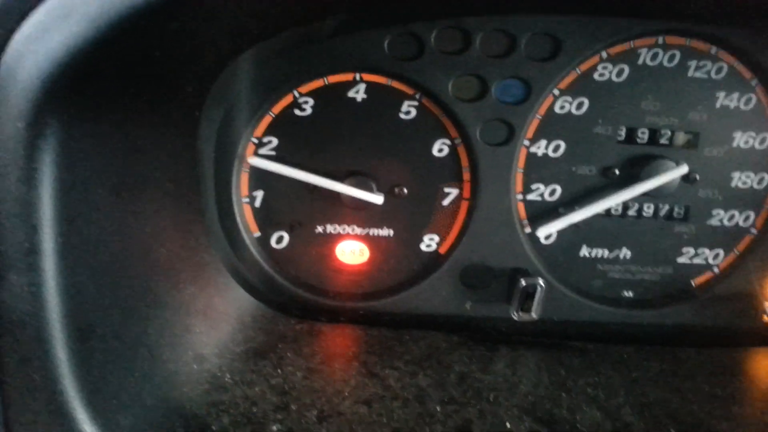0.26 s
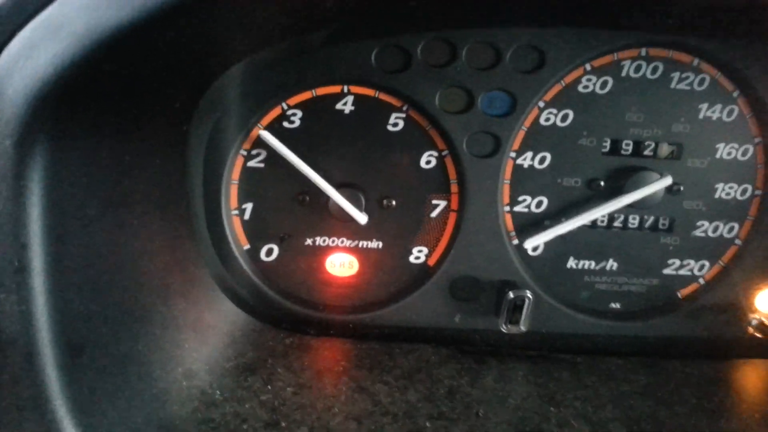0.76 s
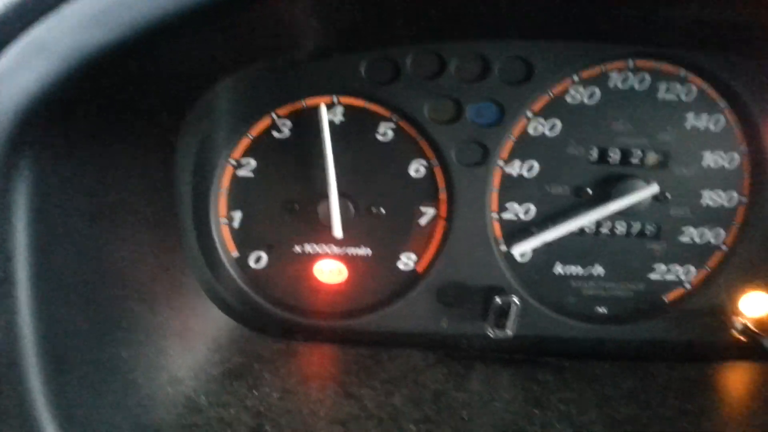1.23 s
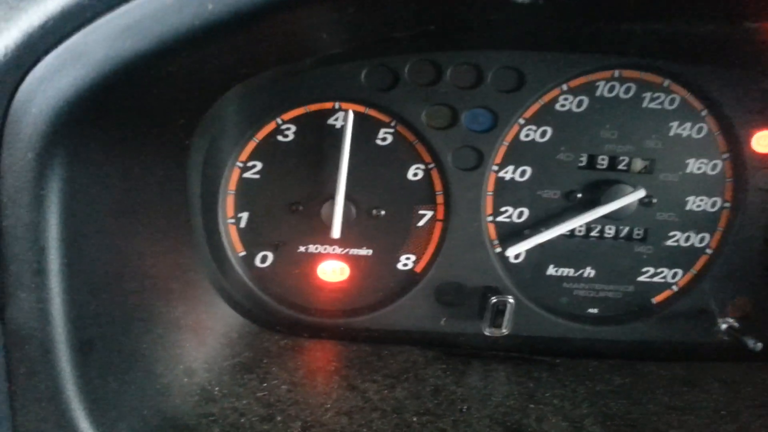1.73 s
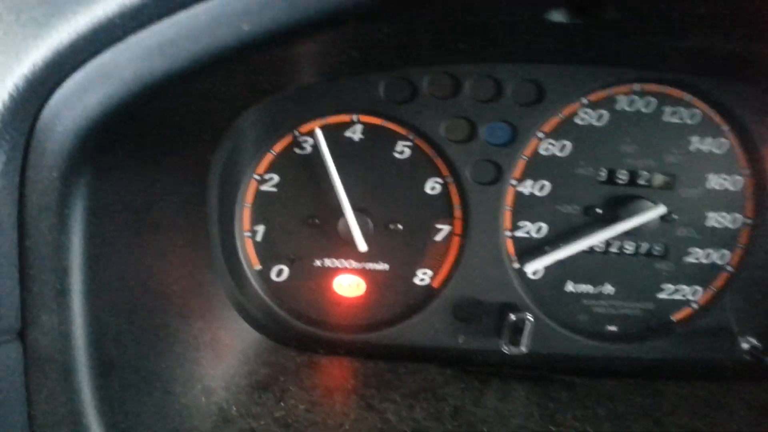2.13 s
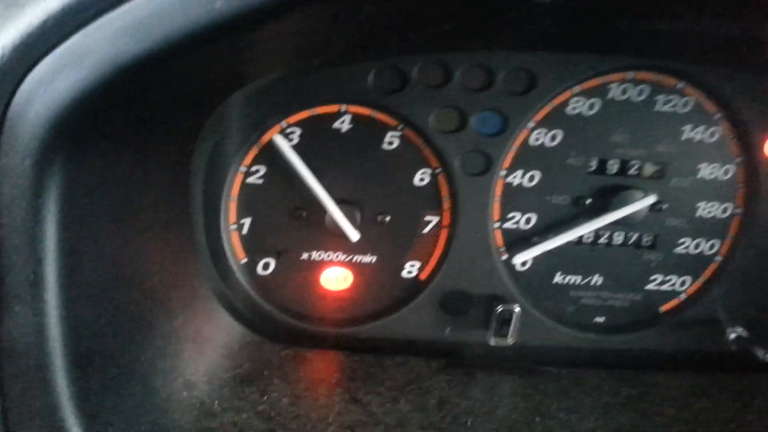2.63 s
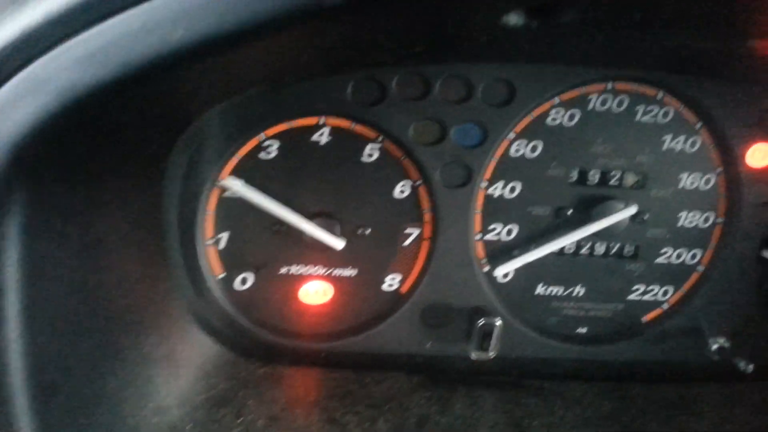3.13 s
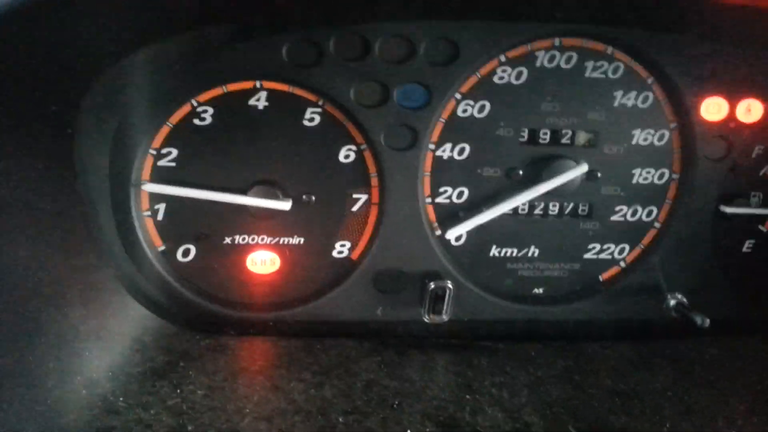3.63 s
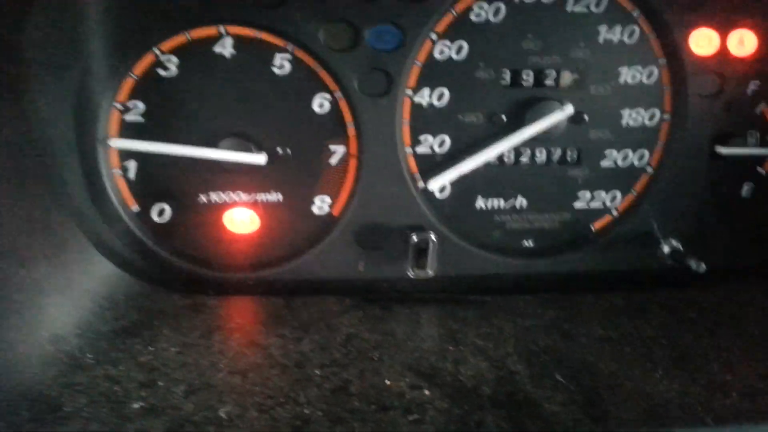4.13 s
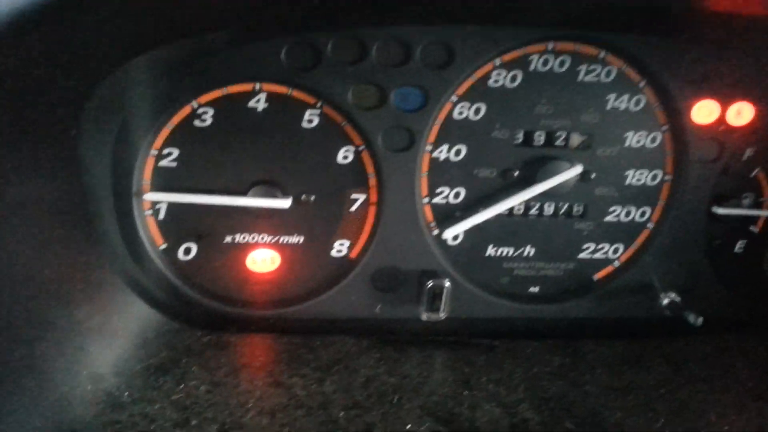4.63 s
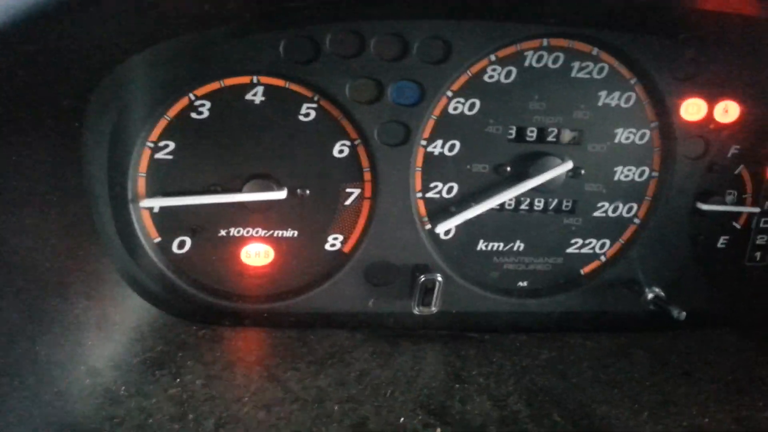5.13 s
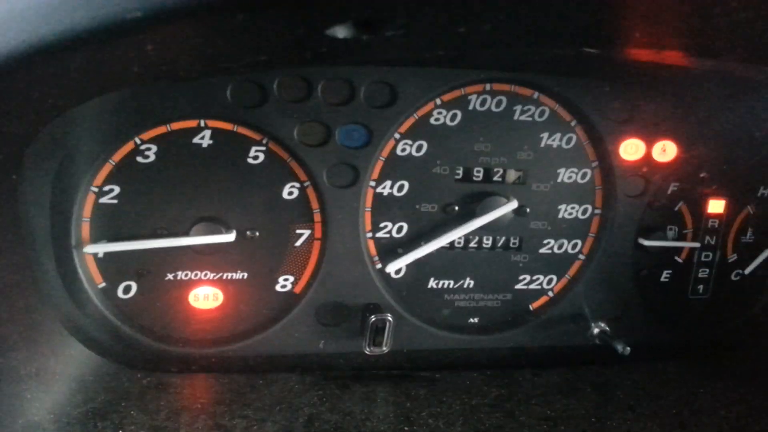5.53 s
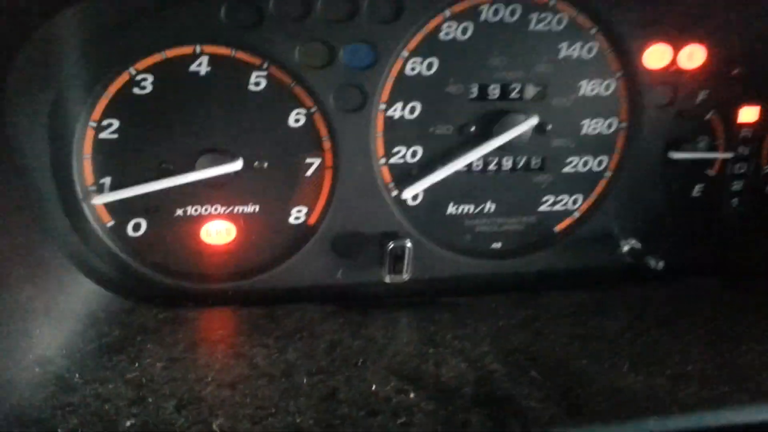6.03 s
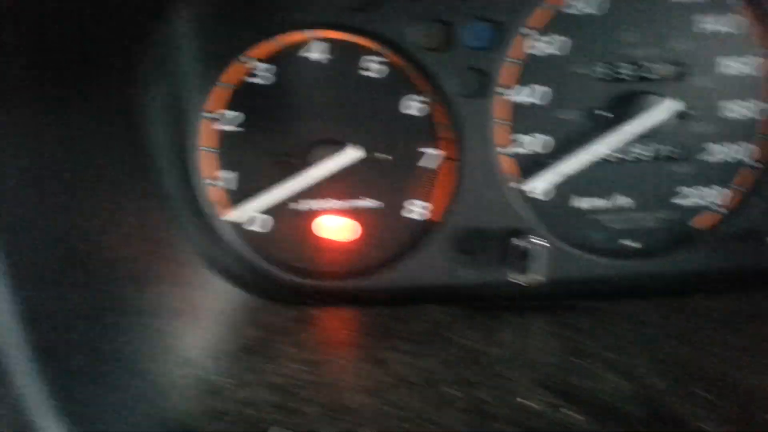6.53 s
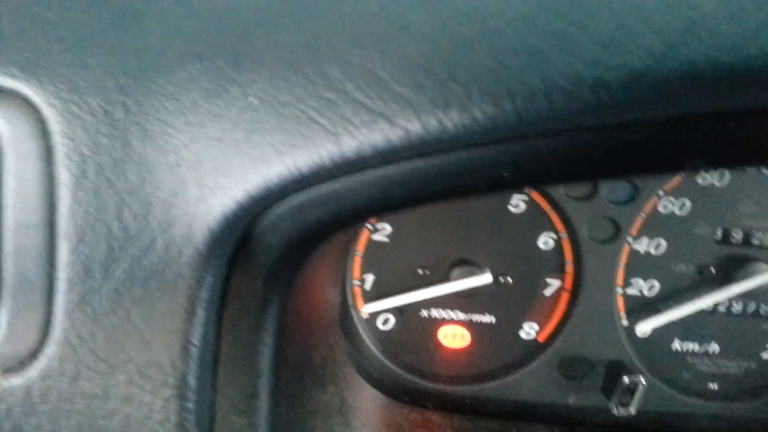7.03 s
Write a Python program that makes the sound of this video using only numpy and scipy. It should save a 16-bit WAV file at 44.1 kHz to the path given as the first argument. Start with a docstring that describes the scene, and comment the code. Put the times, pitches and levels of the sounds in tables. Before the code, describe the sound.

A rough four-cylinder car engine revs up, stumbles and pops back down, thuds slower and slower until nearly stalling, then weakly catches again.

```python
"""The driver's seat of a car with a misfiring four-cylinder engine: it revs to about 4600 rpm, stumbles, falls back,
pops on single cylinders ever more slowly, almost stalls with faint thuds, then catches again into a lumpy idle.
Every exhaust pulse thumps and barks in resonant modes; strong ones steepen into a crack with noisy rasp.
Fast firings merge into a drone of sine orders; the shut throttle leaves the pipe ringing hollowly.
Shaped noise makes the rattle, bay rush, growing hiss, squeaks, scuffs, whirr and a knock."""
import sys
import numpy as np
from scipy import signal
from scipy.fft import rfft, irfft, next_fast_len
from scipy.io import wavfile
from scipy.ndimage import uniform_filter1d, minimum_filter1d

SR = 44100
rng = np.random.default_rng(int(sys.argv[2]) if len(sys.argv) > 2 else 0)


def int16_out(signal):
    """Quantize to a 16-bit WAV file."""
    q = np.round(np.clip(np.atleast_2d(signal).T, -1, 1) * 32767)
    wavfile.write(sys.argv[1], SR, q.astype(np.int16))


N = 320607
T = np.arange(N) / SR
SIZE = 16384  # samples of the transform that shapes each pulse
GRID = np.fft.rfftfreq(SIZE, 1 / SR)

# All dB values are relative levels inside the mix.
# the rev and its drone: time_s, firing_rate_hz, first_order_db, second_order_db, third_order_db
REV = [(0.0, 63, -23, -13, -19.5), (0.02, 62.3, -11, -14, -41.5), (0.102, 64.5, -22, -17.5, -6),
       (0.16, 62.2, -12, -21.5, -39), (0.212, 60.5, -20.5, -13, -24.5), (0.32, 62.7, -14.5, -22.5, -9.5),
       (0.39, 70.2, -11.5, -29, -23.5), (0.47, 64.3, -15, -15.5, -21.5), (0.62, 83.4, -14, -46, -6),
       (0.67, 91.6, -7.5, -27, -9), (0.74, 83, -11, -33, -3), (0.88, 102.5, -3, -26.5, -9),
       (0.96, 110.5, -8, -28.5, -15.5), (1.02, 114.7, -4.5, -7, -17.5), (1.11, 131, -10, -9, -14.5),
       (1.202, 125.6, -9, -13.5, -19.5), (1.299, 131.3, -14, -17, -36), (1.58, 154.6, -10.5, -13, -38),
       (1.72, 128, -7, -21.5, -25.5), (1.95, 111, -8, -15.5, -18), (2.12, 98.6, -6.5, -17.5, -22),
       (2.21, 92.3, -8.5, -34, -18.5), (2.392, 94.3, -11, -38.5, -22.5), (2.42, 95, -4, -16.5, -64),
       (2.45, 84, -11.5, -36, -10), (2.51, 86, -8, -28, -8), (2.73, 82.5, -9.5, -34, -12),
       (2.812, 78, -9, -26.5, -13), (2.89, 74.4, -9, -22, -26), (3.041, 70.4, -11.5, -20, -19),
       (3.16, 59.6, -18, -17.5, -33)]
# the long sinking after it: time_s, firing_rate_hz
STALL = [(3.3, 54), (3.5, 49.5), (4.3, 51), (4.7, 39), (5.5, 37), (6.05, 27), (6.4, 16), (6.9, 21),
         (7.2, 27)]
# how hard the ordinary firings burn: time_s, force_db
LOAD = [(0, -25.5), (.09, -21.5), (.3, -23), (.5, -22.5), (.64, -20.5), (.8, -14.5), (.92, -19.5),
        (1.05, -15.5), (1.2, -24.5), (1.31, -19.5), (1.62, -21), (1.72, -28), (2.1, -27), (2.16, -24.5),
        (2.25, -32), (2.38, -29), (2.47, -23.5), (2.55, -31.5), (2.8, -33.5), (2.88, -27), (3.16, -49.5),
        (4.4, -60), (4.8, -59), (5.35, -54), (6, -78.5), (6.9, -72), (7.27, -46.5)]
# single pulses, from hard pops to the faint compression thuds of the near stall:
# time_s, force_db, extra_body_db, extra_thump_db
POPS = [(0.226, -15, 0.5, 0), (0.275, -12, 2.5, 2), (0.466, -15.5, 1, 0), (0.751, -13.5, 0, 4),
        (0.962, -13.5, 0, -0.5), (1.825, -25.5, 2, -0.5), (2.18, -12.5, -1, -1), (2.212, -24.5, -3.5, -0.5),
        (2.236, -23.5, 5, -1), (2.29, -22, 5, -3.5), (2.324, -28, 3, 1.5), (2.383, -22, 0, -2),
        (2.439, -24.5, -0.5, 2.5), (2.479, -26, -0.5, 4), (2.522, -15, -3.5, 1), (2.565, -8.5, 3, 2.5),
        (2.609, -14, -1, -1), (2.658, -12.5, 2, 0), (2.705, -21, 1, 4.5), (2.748, -14, -4.5, 3),
        (2.8, -14, 3, 0), (3.194, -33, 6.5, 3), (3.211, -25.5, 1, 1), (3.265, -26, 5.5, -4.5),
        (3.285, -27.5, -0.5, -3.5), (3.41, -25.5, 5.5, -0.5), (3.492, -13, -1.5, -3),
        (3.574, -16.5, 0, -3.5), (3.654, -17, -1, -3), (3.738, -22, 0, -4), (3.822, -18, 0.5, 3.5),
        (3.87, -22.5, -2.5, -1.5), (3.892, -17.5, -0.5, -7), (3.914, -20, 0.5, -5.5),
        (3.932, -22.5, -3, -2.5), (3.95, -19.5, -1.5, -2), (4.058, -16, 0, -1.5), (4.138, -15.5, 0.5, -4.5),
        (4.214, -12, 0, -1), (4.292, -13.5, -0.5, 0), (4.371, -17, 2, -2), (4.45, -38, 5.5, -1.5),
        (4.538, -20, 2, -1), (4.638, -44.5, 3.5, -0.5), (4.733, -20.5, -2.5, 2.5), (4.843, -20, -0.5, 0.5),
        (4.949, -22, 2, 0.5), (5.054, -13.5, 2, 3.5), (5.134, -38, 2.5, 0.5), (5.16, -17.5, 0.5, 0),
        (5.211, -20.5, 0, -0.5), (5.26, -21.5, 3.5, -1.5), (5.364, -19, -0.5, -1.5), (5.466, -19.5, 2, 0),
        (5.579, -18.5, 0.5, -2), (5.701, -22, 0.5, -1), (5.828, -24.5, -1, 1.5), (5.96, -30, 0, 1.5),
        (6.107, -39, -2, 1.5), (6.301, -68, -4, 1.5), (6.364, -58.5, -7, -3), (6.431, -62.5, -7, 1),
        (6.553, -37, 4, 0.5), (6.652, -58, 0, 0), (6.718, -53, -3, 0), (6.77, -35, -0.5, 1),
        (6.869, -41, -1, 0), (6.951, -40, 3, 0.5), (6.992, -25.5, -1.5, 1.5), (7.028, -50, -11, -0.5),
        (7.055, -46, 3, 1), (7.107, -42, -5, 1), (7.145, -41.5, -8, 1.5), (7.184, -41.5, -15, 2),
        (7.222, -26, -2.5, 0), (7.257, -43, 6.5, -0.5)]
# the spark drops out: start_s, end_s
MISFIRES = [(.109, .222), (.238, .27), (.376, .4), (.424, .46), (.664, .708), (.724, .74), (.93, .952)]
# cylinders in firing order: relative_strength (no unit)
CYLINDERS = [0.11, -0.41, 1, 0.78]
MAX_EXCESS = 1  # a cylinder burns at most this many spreads above the mean
# spells of uneven burning: start_s, end_s, extra_spread_db between cylinders
ROUGH_SPELLS = [(0.252, 0.5, 2.5), (1.25, 1.67, 4), (2.162, 2.829, 3)]
EVEN_SPREAD_DB, SPELL_FADE_S = 1.1, 0.08
# coasting with the throttle shut: start_s, end_s
COASTS = [(1.64, 2.14), (2.86, 3.12)]
COAST_ATTACK_S, COAST_RELEASE_S = .06, .06

# low cabin and exhaust resonances, the thump: centre_hz, width_hz, level_db
LOW_MODES = [(55, 8, -6), (88.6, 17.1, 1.5), (158.1, 37.6, -2.5), (161.8, 27, -2.5)]
# middle cabin and exhaust resonances, the bark: centre_hz, width_hz, level_db
MID_MODES = [(207.5, 8.7, 2.5), (249.8, 17.8, 5.5), (281, 11, -8.5), (350, 27, -15), (359.4, 88, 2),
             (451.5, 180, -12)]
# the silencer's ring: centre_hz, width_hz, level_db
SILENCER_MODES = [(234, 12, 5), (274, 54, 0), (342.6, 37, 7), (413, 49, -1.5)]
# the short dull body of a single pulse: centre_hz, width_hz, level_db
BODY_MODES = [(137, 61, 4), (345, 123, 5), (431.5, 74, -5), (505, 40, -13)]
# hollow ring of the pipe with the throttle shut: centre_hz, width_hz, level_db
PIPE = [(610, 70, -8), (815, 60, -2), (935, 75, 0), (1160, 90, -13), (1730, 130, -11), (2450, 280, -23)]
# the silencer sings when the fourth order meets its ring: centre_hz, half_width_hz, level_over_bark_db
SING = (246, 18, 2)

# steep front of an ordinary firing: frequency_hz, level_db
RUN_FRONT = [(120, -37), (300, -3.5), (450, 6), (650, 11.5), (900, 1), (1500, -8), (2500, -15.5),
             (3500, -28.5), (5000, -40), (8000, -55), (15000, -56.5)]
# its paths to the seat: delay_s, gain (no unit)
RUN_PATHS = [(0, 0.37), (.0013, -0.11), (.0031, -0.19)]
# steep front of a single pulse: frequency_hz, level_db
FRONT = [(100, -68.5), (300, -21.5), (480, 14.5), (650, 6.5), (850, 1), (1100, -10.5), (1600, -11),
         (2500, -18), (3500, -29.5), (5000, -33.5), (7000, -45.5), (12000, -51), (16000, -54)]
# its paths to the seat: delay_s, gain (no unit)
PATHS = [(0.001, -.8), (.0032, -1.3), (.0055, 0.98), (.0078, 1), (.0098, -1.5), (.012, 0.7), (0.0155, 0.78),
         (.02, 0.074)]

# colour of the tearing gas: frequency_hz, density_db per Hz
RASP = [(200, -32.5), (700, 9.5), (1300, 2), (1750, -1), (2500, -10.5), (3500, -15.5), (5000, -24.5),
        (7000, -30.5), (10000, -31.5), (15000, -49.5)]
# colour of the gas puffs with the throttle shut: frequency_hz, density_db per Hz
OVERRUN = [(200, -24), (600, -5), (780, -5.5), (920, 1.5), (1060, 0), (1350, -17.5), (1750, -3.5),
           (2050, -28), (2500, -17.5), (4000, -41), (8000, -67)]
# colour of the engine bay: frequency_hz, density_db per Hz
BAY = [(30, -13.5), (90, 22.5), (190, 17.5), (250, 25.5), (300, 13.5), (380, 11), (480, 1), (600, 3.5),
       (800, -3.5), (1000, -3), (1350, -13.5), (2000, -13), (2400, -15), (2750, -17), (4500, -25.5),
       (6000, -36.5), (15000, -55.5)]
# colour of loose parts that rattle when the labouring engine shakes: frequency_hz, density_db per Hz
RATTLE = [(200, -5.5), (380, 22.5), (550, 7), (1000, 4.5), (2000, 2), (3000, -3), (4500, -9.5),
          (7000, -27.5), (14000, -37)]
# dull scuffs as the engine catches: middle_s, length_s, level_db
SCUFFS = [(6.661, 0.065, -32.5), (6.985, 0.052, -19), (7.061, 0.039, -19), (7.098, 0.045, -36),
          (7.218, 0.021, -31)]
# their colour: frequency_hz, density_db per Hz
SCUFF = [(150, -14), (300, 14.5), (450, 5.5), (650, -5.5), (1000, -22.5), (2000, -43.5), (6000, -54.5)]
# thin, faint squeaks: middle_s, length_s, level_db
SQUEAKS = [(6.539, 0.016, -49.5), (6.572, 0.1, -62), (6.854, 0.026, -56), (6.939, 0.034, -56),
           (6.984, 0.037, -67)]
# a faint whirr of the engine between the pops: middle_s, length_s, level_db
WHIRR = [(4.2, .7, -48)]
# its colour: frequency_hz, density_db per Hz
WHIRR_COLOUR = [(600, -30), (800, -4), (950, 5), (1100, -10), (1400, -18), (1800, -11), (2050, -20),
                (2200, -2), (2370, -1), (2500, -22), (3350, -14), (4000, -32)]
# a hiss that swells as the engine sinks: middle_s, length_s, level_db
HISS_SWELL = [(6.15, 0.53, -49)]
# its colour: frequency_hz, density_db per Hz
HISS_SWELL_COLOUR = [(500, -7.5), (1600, 3), (3000, 0.5), (4500, -3), (6500, -15), (10000, -12),
                     (15000, -16)]
# a dull knock, one row: start_s, level_db, rise_s, t60_s
KNOCK = (6.233, -20, .002, .07)
# its colour: frequency_hz, density_db per Hz
KNOCK_COLOUR = [(150, -10), (400, 13), (800, 5), (1300, 6), (2200, -2), (3200, -12), (5000, -32),
                (12000, -55)]
# a thin hiss that slowly grows: time_s, level_db
HISS = [(2.8, -64.5), (5, -60.5), (6.15, -59.5), (7.27, -57)]

# a pulse's force sets its colour: the crack follows it fully, the bark nearly, the thump only below a knee
BARK_SLOPE = 0.89
RUN_KNEE_DB, RUN_THUMP_SLOPE = -30, 0.51
POP_KNEE_DB, POP_THUMP_SLOPE = -39.5, 0.57
SOFT_KNEE_DB, SOFT_CRACK_SLOPE = -16, 0.42  # ordinary fronts below this level are weakened further
# above this firing rate a single pulse changes by these dB per octave
RACE_HZ, RACE_THUMP_DB, RACE_BARK_DB, RACE_CRACK_DB = 49.8, -11, -2, 2.5
SLOW_BODY_DB = 4  # the dull push grows per octave below RACE_HZ, for half an octave
BODY_SCATTER = .1  # log spread of the push's pitch
RING_FROM_HZ, RING_FADE_DB = 51.4, 22  # below this firing rate the silencer ring fades, per octave
MERGE_FROM_HZ, MERGE_TO_HZ = 53, 58  # firing rates between which thumps merge into a drone
RUN_BARK_DB, RUN_BARK_OCTAVE_DB = 5.5, -8  # bark of ordinary firings, and its fall per octave once merged
HALVES_FROM_HZ = 140  # below this firing rate the half orders fade
RETURN_S, RETURN_DB = .0058, 0.5  # each front comes back inverted from the open end of the pipe
# dB more bark, returning front and rasp per dB of spread
ROUGH_BARK_GAIN, ROUGH_FRONT_GAIN, ROUGH_RASP_GAIN = 1.5, 0.2, 1.1
CRUISE_HZ = 100  # firing rate to which pipe and bay levels refer
OVERRUN_DB, OVERRUN_OCTAVE_DB = -33.5, 10  # pipe level, and its rise per octave of speed
OVERRUN_LEAK_DB, SLOW_LEAK_DB = -14, -12.5  # weaker with the throttle open, weaker still at low revs
RING_OVER_DB, PUFF_DB, SHUT_BARK_DB = 2, -4, -6  # pipe ring, gas puffs, fall of the bark with throttle shut
RATTLE_DB, RATTLE_BELOW_HZ, RATTLE_POWER = -30, 47, 0.75
BAY_DB, BAY_OCTAVE_DB = -19, 6  # bay noise at CRUISE_HZ, and its rise per octave
DYING_HZ, DYING_FALL_DB = 23, 11  # below this firing rate the bay falls faster, per octave
THROB_DB, CYCLE_THROB_DB = -1, 1.5  # swing with each firing and with each four
TOP_HZ = 15000


def exhaust():
    """Ordinary firings and single pulses ring the cabin, shake loose parts and sound the pipe."""
    fired = firings(scatter=1.0, jitter=.00005)
    run_low, run_high = running(fired)
    pop_low, pop_high = popping()
    highpass = signal.butter(4, 44, "highpass", fs=SR, output="sos")
    low = signal.sosfilt(highpass, run_low + pop_low)
    return low + run_high + singing(fired) + pop_high + rattle(low) + overrun(fired)


def running(fired):
    """Ordinary firings: the low part, and a bark with one steep front each and its inverted return."""
    times, strength_db, dead = fired
    thump_db, bark_db, crack_db = run_levels(times)
    uneven_db = spread(times)

    low_shape = ringing(LOW_MODES, lag=.0001, echo=0.045, round_trip=0.034)
    thump = steady(fired, low_shape, thump_db - 5.5, misfire_db=-6.5) * (1 - merged(T))
    orders = amp(2.5) * drone(fired, lag=0.00018, half_db=-14.0, misfire_db=-4.0)

    bark_shape = ringing(MID_MODES, lag=0.00036, echo=0.084, round_trip=0.01168)
    bark_fall_db = RUN_BARK_OCTAVE_DB * np.maximum(octaves(times, MERGE_TO_HZ), 0)
    bark_db = bark_db + RUN_BARK_DB + bark_fall_db + ROUGH_BARK_GAIN * uneven_db
    bark = steady(fired, bark_shape, bark_db, misfire_db=-17)

    front = shock(RUN_FRONT, RUN_PATHS, skew=0.00026, stray=0)
    direct = steady(fired, front, crack_db, misfire_db=-25)
    returning = times + RETURN_S, strength_db, dead
    return_db = crack_db + RETURN_DB + ROUGH_FRONT_GAIN * uneven_db
    crack = direct - steady(returning, front, return_db, misfire_db=-13.5)
    rasp_gain = amp(-7 + ROUGH_RASP_GAIN * spread(T))
    rasp = rasp_gain * envelope(crack, size=40) * noise(RASP, side_db=0.5)
    return thump + orders, bark + crack + rasp


def drone(fired, lag, half_db, misfire_db):
    """Fast firings merge into three clean orders; unequal cylinders add half orders between them."""
    times, strength_db, dead = fired
    phase = 2 * np.pi * (turns() - lag * speed(T) * np.array([[1], [0]]))
    first, second, third = amp(curves(REV, T)[1:])
    burning = amp(np.interp(T, times, misfire_db * dead + 1.8 * strength_db))
    half_level = amp(half_db) * (spread(T) - EVEN_SPREAD_DB) * np.minimum(speed(T) / HALVES_FROM_HZ, 1) ** 4
    halves = half_level * (np.sin(phase / 2) + .6 * np.sin(3 * phase / 2))
    upper = second * np.sin(2 * phase) + third * np.sin(3 * phase)
    return -merged(T) * (first * (np.sin(phase) + halves) + burning * upper)


def popping():
    """Single pulses: an early thump, bark, silencer ring, dull push of varying pitch, ragged fronts, tearing gas."""
    times = np.transpose(POPS)[0]
    thump_db, bark_db, crack_db = pop_levels()
    low_shape = ringing(LOW_MODES, lag=.0001, echo=1.1, round_trip=0.01107)
    thump = single([low_shape], thump_db - 4.0, lead=0.01051)
    bark_shape = ringing(MID_MODES, lag=0.00025, echo=0.21, round_trip=0.01168)
    bark = single([bark_shape], bark_db + 5.5)

    ring_shape = -ringing(SILENCER_MODES, lag=0.000078, echo=0.031, round_trip=0.0089)
    ring_fade_db = RING_FADE_DB * np.minimum(octaves(times, RING_FROM_HZ), 0)
    ring = single([ring_shape], bark_db + 3.0 + ring_fade_db)

    bodies = []
    for pitch in np.exp(BODY_SCATTER * rng.standard_normal(17)):
        modes = [(hz * pitch, width, db) for hz, width, db in BODY_MODES]
        bodies.append(ringing(modes, lag=0.00041, echo=0.23, round_trip=.014))
    slow_db = SLOW_BODY_DB * np.clip(-octaves(times, RACE_HZ), 0, .5)
    body = single(bodies, bark_db + 8 + slow_db)

    ragged = [shock(FRONT, PATHS, skew=.00028, stray=.0006) for variant in range(13)]
    crack = single(ragged, crack_db - 2.0, lead=.003)
    gas = tearing(crack, lead=0.001, swell=0.005, swell_db=-5)
    rasp = amp(-8.5) * gas * noise(RASP, side_db=0) * amp([[.8], [-.8]])  # louder on the left
    return thump, bark + ring + body + crack + rasp


def tearing(crack, lead, swell, swell_db):
    """Level of the tearing gas: it swells ahead of each front."""
    level = envelope(crack, size=70)
    keep = np.exp(-1 / (abs(swell) * SR))
    # smoothing run backwards in time rises before the front
    ahead = signal.lfilter([1 - keep], [1, -keep], level[::-1])[::-1]
    return np.interp(T + lead, T, level) + amp(swell_db) * ahead


def singing(fired):
    """The fourth order swells as it crosses the silencer's ring, and drops when the spark does."""
    times, strength_db, dead = fired
    hz, width, db = SING
    level_db = np.interp(T, times, run_levels(times)[1] + db - 18 * dead)
    resonance = 1 / (1 + ((4 * speed(T) - hz) / width) ** 2)
    return amp(level_db) * resonance * np.sin(8 * np.pi * turns())


def overrun(fired):
    """With the throttle shut, pulses ring the pipe hollowly with faint puffs of gas; open, it is weaker."""
    times, strength_db, dead = fired
    pipe_shape = ringing(PIPE, lag=0.00024, echo=0.1, round_trip=0.01)
    ring = play(times, amp(strength_db), [pipe_shape])
    ring = ring / (envelope(ring, size=12000) + 1e-6)
    puffs = amp(PUFF_DB) * envelope(ring, size=200) * noise(OVERRUN, side_db=-13.5)
    above = octaves(T, CRUISE_HZ)
    leak_db = OVERRUN_LEAK_DB + SLOW_LEAK_DB * np.clip(-2 * above, 0, 1)
    level_db = OVERRUN_DB + OVERRUN_OCTAVE_DB * above + (1 - coasting(T)) * leak_db
    return amp(level_db) * (amp(RING_OVER_DB) * ring + puffs)


def rattle(thump):
    """Thumps of the slow engine shake loose parts, whose noise follows a power of the thump's level."""
    slowness = np.clip(-2 * octaves(T, RATTLE_BELOW_HZ), 0, 1)
    shaking = envelope(thump, size=300) ** RATTLE_POWER
    return amp(RATTLE_DB) * slowness * shaking * noise(RATTLE, side_db=0.5)


def firings(scatter, jitter):
    """Times of the exhaust pulses, their strengths in dB, and which of them misfire."""
    count = turns()
    times = np.interp(np.arange(int(count[-1])), count, T)
    spread_db = spread(times)
    luck = rng.standard_normal((len(times), 2))
    excess = np.resize(CYLINDERS, len(times)) + scatter * luck[:, 0]
    strength_db = spread_db * np.minimum(excess, MAX_EXCESS)
    dead = sum((times > a) & (times < b) for a, b in MISFIRES)
    # uneven burning also shifts the pulses in time, except while coasting
    shift = jitter * spread_db * (1 - coasting(times)) * luck[:, 1]
    return times + shift, strength_db, dead


def run_levels(at):
    """The ordinary firings follow the load; a light load weakens their crack."""
    thump_db, bark_db, crack_db = colour(curves(LOAD, at)[0], RUN_KNEE_DB, RUN_THUMP_SLOPE)
    soft_db = SOFT_CRACK_SLOPE * np.minimum(crack_db - SOFT_KNEE_DB, 0)
    return thump_db, bark_db + SHUT_BARK_DB * coasting(at), crack_db + soft_db


def pop_levels():
    """At high revs a single pulse thumps and barks less, and cracks more."""
    times, force_db, extra_body_db, extra_thump_db = np.transpose(POPS)
    thump_db, bark_db, crack_db = colour(force_db, POP_KNEE_DB, POP_THUMP_SLOPE)
    racing = np.maximum(octaves(times, RACE_HZ), 0)
    thump_db = thump_db + extra_thump_db + RACE_THUMP_DB * racing
    bark_db = bark_db + extra_body_db + RACE_BARK_DB * racing
    return thump_db, bark_db, crack_db + RACE_CRACK_DB * racing


def colour(force_db, knee_db, thump_slope):
    """Thump, bark and crack in dB of pulses of the given force."""
    return thump_slope * np.minimum(force_db - knee_db, 0), BARK_SLOPE * force_db, force_db


def speed(at):
    """Firings a second at the given times."""
    return curves([row[:2] for row in REV] + STALL, at)[0]


def turns():
    """Number of firings so far, at each sample."""
    return np.cumsum(speed(T)) / SR


def octaves(at, hz):
    """How many octaves the firing rate lies above hz."""
    return np.log2(speed(at) / hz)


def spread(at):
    """How unequally the cylinders burn, in dB."""
    spells = [db * gate(at, a, b, SPELL_FADE_S, SPELL_FADE_S) for a, b, db in ROUGH_SPELLS]
    return EVEN_SPREAD_DB + sum(spells)


def merged(at):
    """How far the single thumps have merged into a drone, 0-1."""
    return np.clip((speed(at) - MERGE_FROM_HZ) / (MERGE_TO_HZ - MERGE_FROM_HZ), 0, 1)


def coasting(at):
    """How far the engine coasts with the throttle shut, 0-1."""
    return sum(gate(at, a, b, COAST_ATTACK_S, COAST_RELEASE_S) for a, b in COASTS)


def steady(fired, shape, level_db, misfire_db):
    """A train of ordinary firings, evened out to the given running levels."""
    times, strength_db, dead = fired
    sizes = amp(strength_db)
    built_up = np.interp(times, T, envelope(play(times, sizes, [shape]), size=4000))
    return play(times, sizes / built_up * amp(level_db + misfire_db * dead), [shape])


def single(shapes, level_db, lead=0):
    """The single pulses at the given levels, starting lead seconds early."""
    peak = np.mean([envelope(shape, size=440).max() for shape in shapes])
    return play(np.transpose(POPS)[0] - lead, amp(level_db) / peak, shapes)


def play(times, sizes, shapes):
    """A stereo pulse at each time, taking the shapes in turn."""
    at = np.clip(times * SR, 0, N - 1).astype(int)
    count = len(shapes)
    total = 0
    for k, shape in enumerate(shapes):
        clicks = np.bincount(at[k::count], sizes[k::count], N)
        total = total + signal.oaconvolve(clicks[None], shape, axes=1)[:, :N]
    return total


def ringing(modes, lag, echo, round_trip):
    """Stereo answer of resonances to one push and its echo down the pipe; the left hears it lag seconds later."""
    f = GRID
    h = 0
    for k, (centre, width, db) in enumerate(modes):
        damping = 1j * f * width
        h = h + (-1) ** k * amp(db) * damping / (centre * centre - f * f + damping)
    h = h * (1 + echo * np.exp(-2j * np.pi * f * round_trip))
    h = h / (1 + 1j * f / (2 * modes[-1][0])) ** 3  # dull the top
    return -irfft([h * np.exp(-2j * np.pi * f * lag), h])[:, :SIZE // 4]


def shock(colour_points, paths, skew, stray):
    """A causal steep front, arriving along slightly straying paths that favour right and left in turn."""
    # folding the cepstrum gives minimum phase: all the energy as early as possible
    cepstrum = irfft(np.log(amp(along(colour_points, GRID))))
    cepstrum[1:SIZE // 2] *= 2
    cepstrum[SIZE // 2 + 1:] = 0
    delays, gains = np.transpose(paths)
    delays = np.abs(delays + stray * rng.standard_normal(len(delays)))
    late = skew * ((np.arange(len(delays)) + np.arange(2)[:, None] + 1) % 2)
    arrivals = gains @ np.exp(-2j * np.pi * (delays + late)[..., None] * GRID)
    return irfft(np.exp(rfft(cepstrum)) * arrivals)[:, :SIZE // 8]


def scuffs():
    """Short, dull rubs of shaped noise."""
    return swells(SCUFFS) * noise(SCUFF)


def small_sounds():
    """A faint whirr, a swelling hiss, a dull knock and a few thin squeaks, all of shaped noise."""
    start, db, rise, t60 = KNOCK
    age = np.maximum(T - start, 0)
    knock = amp(db - 60 * age / t60) * (1 - np.exp(-age / rise)) * noise(KNOCK_COLOUR)
    squeak = noise([(8500, -62), (9700, -19.0), (9930, 34.5), (10200, -1.0), (11500, -35.5)])
    whirr = swells(WHIRR) * noise(WHIRR_COLOUR)
    hiss = swells(HISS_SWELL) * noise(HISS_SWELL_COLOUR, side_db=0.5)
    return knock + swells(SQUEAKS) * squeak + whirr + hiss


def background():
    """Muffled rush of the engine bay, growing with speed and throbbing with the firings, over a growing thin hiss."""
    thin = noise([(3000, -31.5), (6000, -4.0), (9500, -1.0), (15000, -4.0)], side_db=1.0)
    throb_db = THROB_DB * np.cos(2 * np.pi * turns()) + CYCLE_THROB_DB * np.cos(np.pi * turns() / 2)
    dying_db = DYING_FALL_DB * np.minimum(octaves(T, DYING_HZ), 0)
    bay_db = BAY_DB + BAY_OCTAVE_DB * octaves(T, CRUISE_HZ) + dying_db
    bay = amp(bay_db + throb_db) * noise(BAY, side_db=-6.0)
    return bay + amp(curves(HISS, T)[0]) * thin


def amp(db):
    """Decibels to linear gain."""
    return 10 ** (np.asarray(db) / 20)


def unit(x):
    """x scaled to an rms of 1."""
    return x / np.sqrt(np.mean(x ** 2) + 1e-20)


def along(points, hz):
    """Points of frequency and value, joined on a log frequency axis."""
    f, v = np.transpose(points)
    return np.interp(np.log(hz + 1), np.log(f + 1), v)


def curves(rows, at):
    """Each column of a table at the given times."""
    s, *cols = np.transpose(rows)
    return [np.interp(at, s, c) for c in cols]


def gate(at, start, end, attack, release):
    """Rises to 1 around start, holds, and falls around end."""
    return np.clip(np.minimum((at - start) / attack, (end - at) / release) + .5, 0, 1)


def swells(rows):
    """Level of smooth bell-shaped swells, each centred on its time."""
    return sum(amp(db) * np.exp(-(2 * (T - s) / length) ** 2) for s, length, db in rows)


def filtered(x, response):
    """x times a response of frequency."""
    m = next_fast_len(N + SR // 2)
    return irfft(rfft(x, m) * response(np.fft.rfftfreq(m, 1 / SR)), m)[..., :N]


def noise(spectrum, side_db=-2):
    """Stereo noise of rms 1; side_db sets its width."""
    mid, side = filtered(rng.standard_normal((2, N)), lambda hz: amp(along(spectrum, hz)))
    side = amp(side_db) * side
    return unit(np.array([mid + side, mid - side]))


def envelope(x, size):
    """Running rms of the middle of a stereo pair, over size samples."""
    power = uniform_filter1d(x.mean(0) ** 2, size, mode="constant")
    return np.sqrt(np.abs(power) + 1e-12)


def scene():
    """The whole mix, a little louder on the left."""
    return (exhaust() + background() + small_sounds() + scuffs()) * amp([[.4], [-.4]])


def record(dry):
    """A quick limiter holds down the loudest pulses and the rest clips softly, between a low and a high cut."""
    dry = filtered(dry, lambda hz: hz ** 2 / (hz ** 2 + 25 ** 2))
    needed = 1 / np.maximum(np.abs(dry).max(0) / 1.407, 1)
    limited = dry * uniform_filter1d(minimum_filter1d(needed, size=400), size=400)
    hardness = 20  # higher keeps the waveform straighter up to full scale
    rounded = limited / (1 + np.abs(limited) ** hardness) ** (1 / hardness)
    return filtered(rounded, lambda hz: hz < TOP_HZ)


dry = scene()
out = record(dry)
int16_out(out)
```